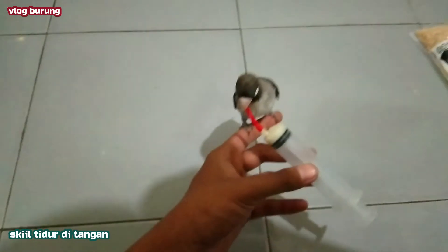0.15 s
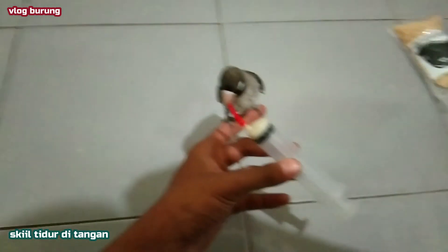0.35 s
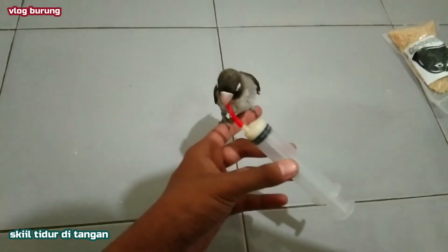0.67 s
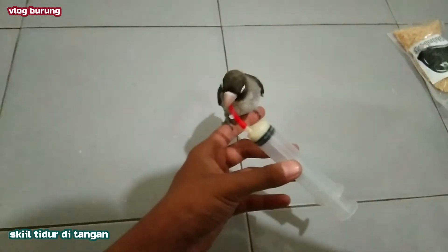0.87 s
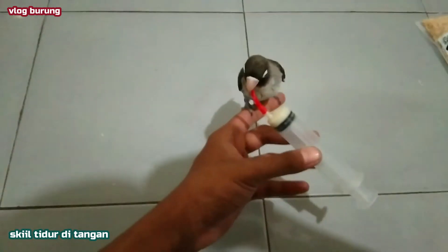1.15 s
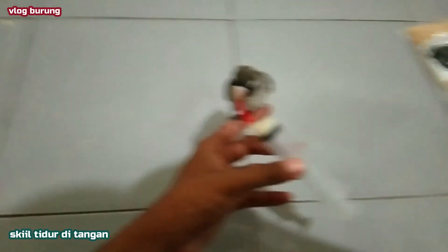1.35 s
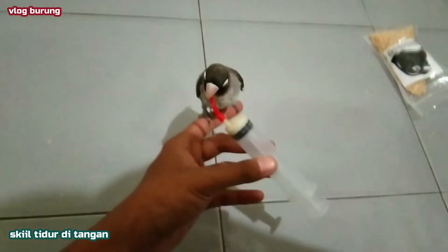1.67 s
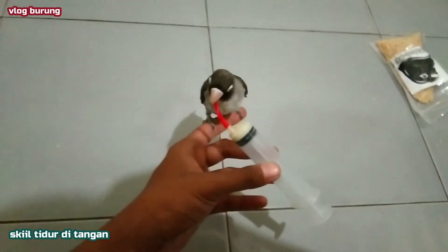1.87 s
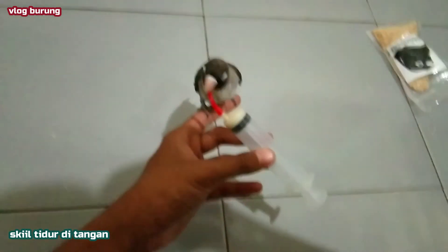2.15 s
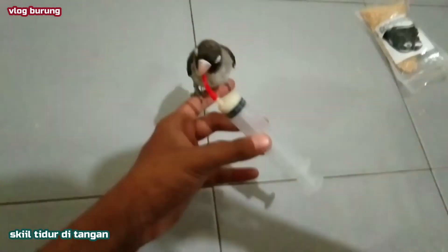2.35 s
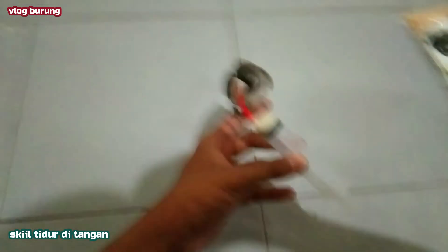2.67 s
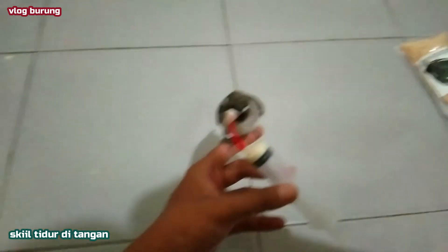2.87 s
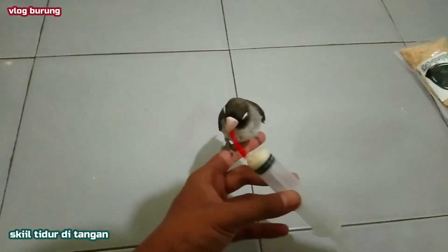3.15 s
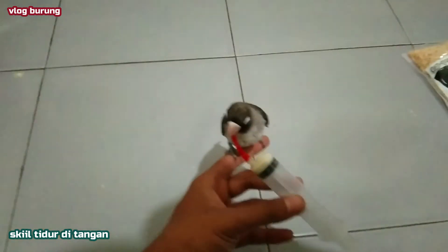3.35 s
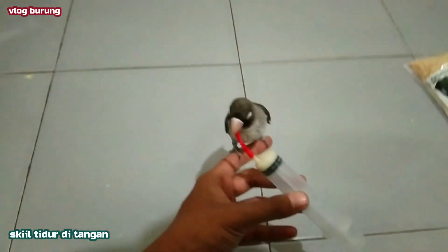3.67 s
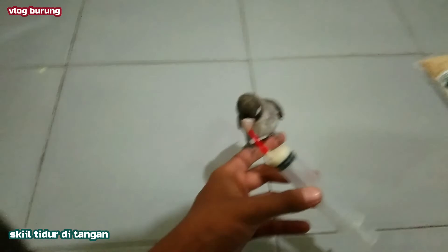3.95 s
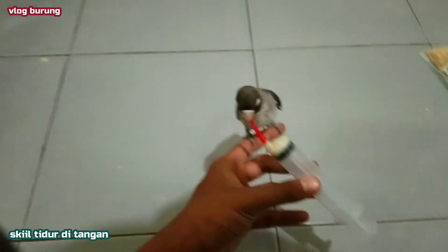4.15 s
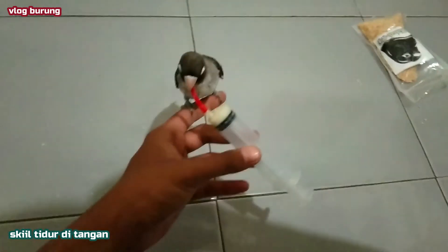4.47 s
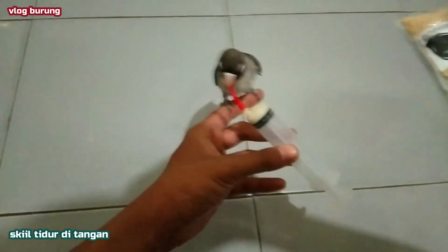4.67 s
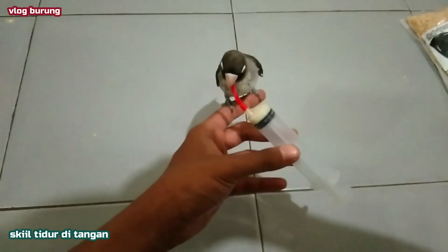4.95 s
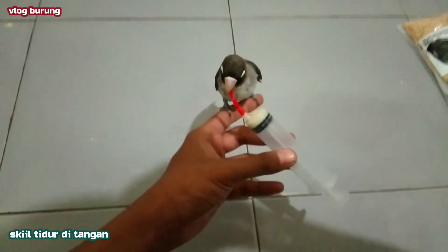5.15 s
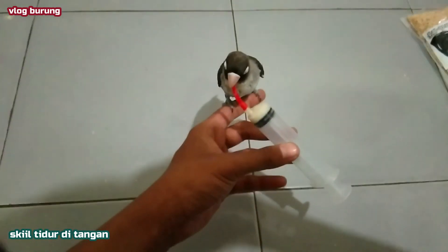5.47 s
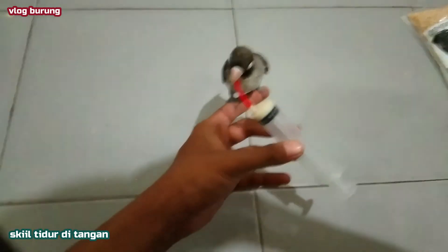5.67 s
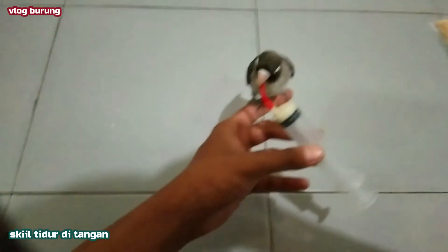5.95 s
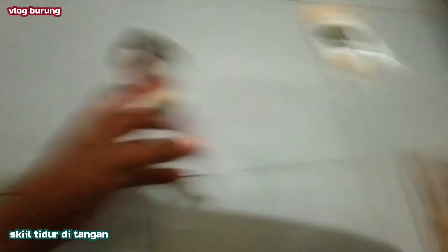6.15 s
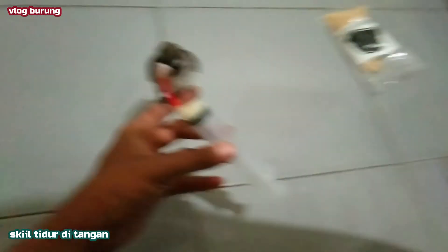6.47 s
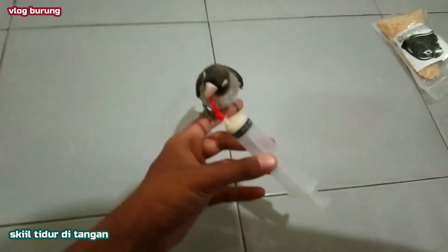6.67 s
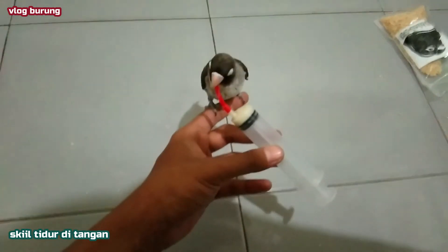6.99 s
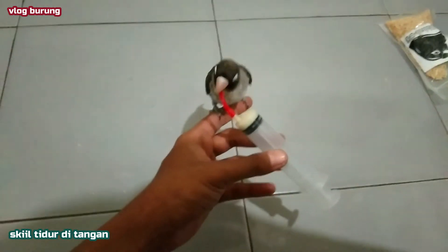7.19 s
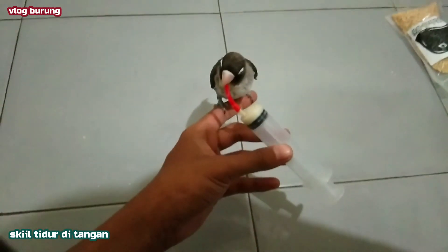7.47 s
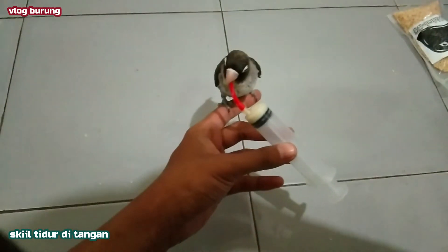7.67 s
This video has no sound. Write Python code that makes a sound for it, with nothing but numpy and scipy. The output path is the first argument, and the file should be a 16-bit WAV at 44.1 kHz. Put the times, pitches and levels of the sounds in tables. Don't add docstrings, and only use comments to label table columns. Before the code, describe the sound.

A handheld phone picks up its own handling, extremely close and dry. From the start, fingers make short hisses and scrapes on plastic, with low grip rumble and irregular ticks. A hard knock hits at 0.64 s, then a loud, rough rasp at 1.0-1.15 s ending in a clack; another sharp clack comes at 1.7. Smaller knocks thin out around 2.7-3.8. Faint, fast falling bird whistles, far away and echoing off hard walls, come at 0.5-0.7, 2.8-3.2, 3.8-4.0, 5.3-5.6 and 7.3-7.7. A barely audible hollow tap from another room falls at 3.6. Strong cracking knocks strike at 4.03 and 4.9, a second loud rasp at 5.7-5.85, and heavy rumbles at 6.2. A cluster of clacks and rumble at 7.05 leads to deep bass swells from 7.3, fading amid small ticks. Quiet room tone persists; loud peaks clip slightly.

```python
import sys
import numpy as np
from scipy import signal
from scipy.fft import rfft, irfft
from scipy.io import wavfile
from scipy.ndimage import uniform_filter1d, minimum_filter1d

SR = 44100
rng = np.random.default_rng(int(sys.argv[2]) if len(sys.argv) > 2 else 0)


def dump_mix(stems):
    frames = np.atleast_2d(stems).T
    limited = np.clip(frames, -1, 1)
    pcm = np.round(limited * 32767).astype(np.int16)
    wavfile.write(sys.argv[1], SR, pcm)


def undo_db(level):
    steps = np.asarray(level, float) / 20
    return 10 ** steps


N = 344862

# time in seconds, hiss level in dB, scrape level in dB.
FINGER_STROKES = [(0.0, -36.5, -28), (0.035, -56, -47), (0.108, -55.5, -51.5), (0.156, -43, -39),
                  (0.269, -58.5, -53), (0.392, -42.5, -41.5), (0.506, -58.5, -74), (0.583, -52.5, -72),
                  (0.65, -47.5, -25), (0.746, -57, -54), (0.8, -45, -51), (0.897, -50, -49.5),
                  (0.962, -50.5, -48.5), (0.984, -27, -28), (1.04, -13.5, -18.5), (1.118, -18.5, -19.5),
                  (1.143, -53, -62.5), (1.168, -54.5, -29.5), (1.234, -49.5, -47), (1.323, -29.5, -27),
                  (1.381, -39, -51), (1.483, -46.5, -43), (1.584, -60, -65), (1.699, -46, -33),
                  (1.898, -60.5, -61.5), (2.089, -42, -40), (2.15, -56.5, -55.5), (2.277, -32.5, -30.5),
                  (2.325, -51.5, -47.5), (2.365, -33, -36), (2.395, -46, -46), (2.469, -33, -32.5),
                  (2.535, -56.5, -48), (2.668, -38, -43.5), (2.816, -55.5, -60.5), (3.044, -49, -57.5),
                  (3.179, -66, -62), (3.23, -50, -46), (3.35, -55.5, -54), (3.588, -52.5, -53),
                  (3.64, -58.5, -47), (3.74, -57.5, -60), (3.825, -52, -55), (3.848, -40.5, -37.5),
                  (3.882, -53.5, -48), (4.009, -35, -40.5), (4.043, -40, -21.5), (4.073, -48, -30.5),
                  (4.242, -51.5, -61), (4.358, -41.5, -44.5), (4.508, -55.5, -58.5), (4.621, -44.5, -54),
                  (4.723, -50.5, -62), (4.742, -51.5, -48.5), (4.811, -61.5, -58.5), (4.886, -54, -42.5),
                  (4.921, -41, -20), (5.059, -59.5, -57), (5.141, -47.5, -51), (5.28, -57.5, -59.5),
                  (5.425, -51, -57.5), (5.477, -29.5, -27.5), (5.509, -50, -52), (5.651, -47.5, -62),
                  (5.684, -50, -41.5), (5.704, -24, -26.5), (5.763, -11.5, -21.5), (5.822, -17.5, -23.5),
                  (5.868, -51.5, -44), (5.908, -55.5, -42.5), (5.969, -38, -51), (6.013, -27, -26.5),
                  (6.136, -41, -60), (6.194, -39, -36), (6.242, -43, -30.5), (6.348, -62, -52.5),
                  (6.388, -48, -55), (6.449, -49, -56.5), (6.652, -42.5, -38), (6.708, -50.5, -54.5),
                  (6.773, -54, -46), (7.022, -53.5, -55.5), (7.057, -35.5, -27.5), (7.091, -53.5, -34.5),
                  (7.177, -46, -49.5), (7.514, -53, -49.5), (7.564, -56.5, -57.5), (7.598, -62, -30.5),
                  (7.642, -56.5, -61.5), (7.725, -60.5, -62.5), (7.751, -67, -54), (7.819, -60.5, -54)]
# time in seconds, rumble level in dB.
GRIP_SQUEEZE = [(0.0, -37.5), (0.158, -36.5), (0.212, -43), (0.241, -35.0), (0.556, -54.5), (0.644, -23),
                (0.761, -47.5), (1.057, -22), (1.142, -41.5), (1.178, -29), (1.216, -42), (1.291, -28),
                (1.616, -43), (1.7, -22.5), (1.918, -47.5), (2.087, -28.5), (2.142, -50), (2.298, -33),
                (2.383, -40.5), (2.411, -28), (2.536, -38), (2.662, -21.5), (2.833, -53), (3.239, -42.5),
                (3.632, -43.5), (3.683, -48), (3.841, -31.5), (3.979, -33), (4.047, -22.5), (4.109, -41),
                (4.249, -50), (4.273, -35.5), (4.345, -29), (4.473, -50), (4.559, -37.5), (4.725, -45),
                (4.742, -39.5), (4.817, -39.5), (4.921, -17.5), (5.06, -56), (5.21, -31.5), (5.279, -55.5),
                (5.479, -29), (5.598, -63), (5.693, -27), (5.761, -14), (5.845, -23), (5.871, -27),
                (5.938, -43.5), (6.099, -23.5), (6.156, -35), (6.176, -16), (6.218, -12.5), (6.252, -24.5),
                (6.323, -39), (6.396, -41.5), (6.455, -40.5), (6.597, -28.5), (6.912, -44), (7.028, -42.5),
                (7.045, -13), (7.057, -12.5), (7.09, -29.5), (7.207, -36.5), (7.33, -29.5), (7.476, -46),
                (7.609, -31.5), (7.666, -60.5), (7.724, -54), (7.74, -52.5), (7.751, -23.5), (7.819, -56)]
# start in seconds, then thud, clack and crack levels in dB.
GRIP_SLIPS = [(0.0555, -31, -30.5, -32.5), (0.0749, -30.5, -35, -33), (0.1019, -31, -40, -48.5),
              (0.142, -29.5, -31.5, -41), (0.2281, -14.5, -17, -33.0), (0.2459, -48, -40.5, -45.0),
              (0.5438, -65.5, -54.5, -40), (0.5946, -41.5, -43.5, -47.5), (0.6131, -27, -25.5, -50),
              (0.6382, -4, -1.5, -6.5), (0.7805, -32, -44.5, -42.0), (0.87, -42.5, -41.5, -46.5),
              (0.9269, -48.5, -38, -30.5), (0.947, -42.5, -45.5, -41), (0.9674, -47, -43, -31.5),
              (0.9768, -22, -23, -22.5), (1.163, -16, -6, -6.5), (1.2767, -17, -14.5, -25),
              (1.309, -40.5, -39.5, -22), (1.3432, -38.5, -22, -23), (1.397, -33, -38.5, -41),
              (1.4788, -32.5, -31, -31), (1.5529, -29, -30.5, -33.5), (1.6267, -46.5, -35.5, -41.5),
              (1.6391, -47, -32.5, -50.0), (1.669, -46, -37.5, -44.5), (1.693, -11.5, -6, -5.5),
              (1.7331, -25, -34, -43), (1.752, -18.5, -15.0, -28), (1.76, -24.5, -38.5, -46),
              (1.8664, -44.5, -56, -52), (1.895, -40, -33.5, -40.5), (2.0237, -29, -28.5, -50),
              (2.0836, -10.5, -25, -30), (2.1621, -28, -38.5, -51), (2.1736, -31.5, -36.5, -40),
              (2.208, -48.5, -36.5, -31), (2.2379, -45, -27, -27.5), (2.2627, -35.5, -58, -35.5),
              (2.2824, -30, -20, -29.5), (2.3082, -14.5, -13.5, -22), (2.4011, -25.5, -35, -32.0),
              (2.4638, -26.5, -56.5, -26.5), (2.4765, -29.5, -18.0, -36), (2.592, -32.5, -31.5, -46.5),
              (2.6065, -47.5, -24, -32.0), (2.62, -50, -31, -32.5), (2.632, -41.5, -42, -30.5),
              (2.6498, -20.5, -25.5, -46.5), (2.6669, -65, -22, -23.5), (2.7264, -31, -38, -30),
              (2.9702, -32.5, -38, -55), (3.0457, -30.5, -30.5, -35.0), (3.1932, -36.5, -32, -37.0),
              (3.2253, -30, -30.5, -33.5), (3.2881, -33, -41, -52), (3.3254, -38, -34.5, -44.5),
              (3.4182, -30.5, -29.5, -34.5), (3.4563, -34.5, -36, -51.0), (3.515, -29, -36.5, -40.5),
              (3.7021, -35.5, -50.5, -31), (3.776, -31.5, -43.5, -44.5), (3.8399, -23.5, -32, -35.5),
              (3.899, -35.5, -34, -31), (3.943, -23.5, -35.5, -28), (3.975, -26.5, -25.0, -30),
              (4.0172, -16.5, -19, -33.5), (4.0337, -10.5, -3, -4.5), (4.0457, -22.5, -6.5, -22),
              (4.195, -31.5, -34.5, -49), (4.2688, -24, -28, -42.5), (4.4067, -36.5, -34.5, -35.5),
              (4.5021, -34.5, -36.0, -54), (4.5109, -33, -52.5, -62.0), (4.5571, -21.5, -26.5, -34),
              (4.7375, -18, -23.5, -34), (4.8884, -34.5, -46.5, -44), (4.9057, -22, -5.5, 0),
              (4.9187, -32.5, -24.0, -19), (4.9309, -18.0, -14, -17.0), (4.9454, -19, -21.5, -31),
              (5.0858, -34, -41.5, -55), (5.2314, -33.5, -39.5, -57), (5.296, -36, -41.5, -55),
              (5.3614, -28.5, -29.5, -42.5), (5.4389, -29, -35, -26.5), (5.4631, -18.5, -23, -38),
              (5.6928, -13.0, -16, -21), (5.8525, -19.5, -17.5, -37), (5.8732, -8, -10, -27),
              (5.957, -65, -65, -44), (6.061, -43, -25.0, -28.5), (6.0951, -16.5, -29, -46.5),
              (6.1666, -30.5, -31, -37.5), (6.1846, -22, -33.5, -25), (6.1973, -19, -12.5, -19.5),
              (6.2265, -27, -20.5, -25.5), (6.237, -33.5, -17, -21.5), (6.248, -13, -31, -25.5),
              (6.283, -34, -41.5, -35), (6.3768, -37, -26.5, -29.5), (6.3871, -23.5, -40, -41.5),
              (6.4672, -31.5, -38.5, -55.5), (6.5266, -22, -26.5, -25.5), (6.583, -21.5, -34, -46),
              (6.6389, -27, -34, -31.5), (6.7623, -32.0, -25.5, -37.5), (6.8196, -35.5, -34, -51),
              (6.8606, -51, -34.5, -58.5), (6.9233, -34.5, -36.5, -39.5), (6.991, -29.5, -36.5, -57.5),
              (7.042, -15, -9, -23.0), (7.056, -18, -6.5, -8.5), (7.0649, -10.5, -8, -7.5),
              (7.1163, -14.5, -24.0, -25.5), (7.1239, -22.5, -29, -31), (7.1993, -27, -39.5, -46.5),
              (7.2363, -30, -20.5, -28), (7.2674, -41, -34.5, -35), (7.2857, -21.5, -42.5, -40.5),
              (7.3288, -10, -15.5, -25.0), (7.3595, -41.5, -35.5, -47), (7.3995, -25.5, -36, -36.0),
              (7.4202, -73.5, -48.5, -40), (7.4417, -22, -31, -39), (7.479, -55.5, -52.5, -35.5),
              (7.5088, -24.5, -28.5, -44), (7.5489, -53, -52.5, -42.5), (7.5912, -19, -23.0, -31.5),
              (7.6003, -42.5, -39, -37), (7.6788, -39, -43.0, -45), (7.7375, -18.5, -33.5, -54),
              (7.7731, -58.5, -61.5, -41)]
# frequency in Hz, level in dB, time to fade by 60 dB in seconds.
THUD_MODES = [(130, -38, 0.066), (227.8, -15, 0.02), (289.6, -7, 0.111), (328.8, 11, 0.0455),
              (411.2, 9.5, 0.0333), (539.4, 2.5, 0.0433)]
CLACK_MODES = [(933.1, -2, 0.0482), (1050.4, 9.5, 0.02), (1376.6, 2.5, 0.0286), (1832, -4, 0.0254),
               (2122, -5, 0.0106), (724, -9.5, 0.0206), (1581, -1, 0.0127)]
CRACK_MODES = [(3132, 3.5, 0.00737), (3700, 11.5, 0.00423), (4593, 7.5, 0.00234), (5530, 12.5, 0.002266),
               (6780, 14, 0.00153), (9260, -8.5, 0.0023)]
# frequency in Hz, level in dB per Hz.
HISS_COLOUR = [(1200, -9), (2300, -4.5), (3500, 0.5), (7000, 3), (16000, -3)]
SCRAPE_COLOUR = [(400, -19.5), (700, 1), (1050, 1.5), (1400, 0.5), (2000, -7), (3400, -26.5)]
RASP_COLOUR = [(1300, -15), (2100, 3.5), (3800, -3.5), (6000, -37)]
RUMBLE_COLOUR = [(40, -20), (100, -10.5), (220, -6.5), (320, 3.5), (450, -5), (650, -11), (1200, -43.5)]
# time in seconds, bass level in dB above the grip rumble.
ARM_SWING = [
    (7.25, -28),
    (7.38, 2),
    (7.8, -5),
]
# start in seconds, length in seconds, start pitch in Hz,
# end pitch in Hz, level in dB, rest on the middle note in seconds.
WHISTLES = [(0.518, 0.058, 4500, 2278, -33.5, .012), (0.725, 0.0564, 4550, 2330, -41, 0.0147),
            (2.775, 0.082, 4274, 2172, -38, 0.0019), (2.866, 0.101, 4183, 2042, -36, 0.017),
            (2.982, 0.095, 4420, 2300, -39, 0.0272), (3.1, 0.086, 4206, 2668, -42, 0.0323),
            (3.834, 0.0856, 4090, 2152, -34, 0.00205), (3.947, 0.087, 4113, 2400, -37.5, .025),
            (5.302, 0.0824, 4240, 2282, -37.5, 0.0041), (5.409, 0.11, 3990, 2390, -39, 0.02786),
            (5.511, .11, 4077, 2329, -35, 0.0188), (7.33, 0.0825, 4133, 2358, -37.5, 0.0105),
            (7.424, 0.0914, 4308, 2307, -37, 0.0297), (7.545, 0.097, 3860, 2374, -40, 0.0363),
            (7.666, 0.037, 4153, 3183, -39, .001)]
# frequency in Hz, level in dB per Hz.
HOUSE_COLOUR = [(40, -7.5), (320, 5.5), (500, -9.5), (1200, -4.5), (3000, -50), (7000, -17.5), (16000, -12)]
# frequency in Hz, gain in dB.
MICROPHONE_RESPONSE = [(6800, 0), (7600, -4.5), (8800, -14), (11400, -24), (15400, -28), (16000, -54.5)]


def colour(x, points, band=(0, SR)):
    hz = np.fft.rfftfreq(len(x), 1 / SR)
    at, db = np.transpose(points)
    spectrum = rfft(x) * undo_db(np.interp(np.log(hz + 1), np.log(at), db))
    in_band = (hz > band[0]) & (hz < band[1])
    power = np.sum(np.abs(spectrum[in_band]) ** 2) * 2 / len(x) ** 2
    return irfft(spectrum, len(x)) / np.sqrt(power)


def curve(table):
    seconds, *columns = np.transpose(table)
    return [np.interp(np.arange(N) / SR, seconds, column) for column in columns]


def walk(rate):
    hold = int(SR / rate)
    levels = np.repeat(rng.standard_normal(N // hold + 1), hold)
    return uniform_filter1d(levels, hold)[:N]


def grains(scatter_db):
    sizes = undo_db(scatter_db * rng.exponential(size=N))
    return rng.standard_normal(N) * sizes


def ring(pushes, modes, place_db):
    out = 0
    for hz, db, t60 in modes:
        pole = np.exp(2j * np.pi * hz / SR - np.log(1000) / (t60 * SR))
        weight = undo_db(db + place_db * rng.standard_normal((len(pushes), 1)))
        out = out + weight * signal.lfilter([1], [1, -pole], pushes).imag
    return out


def fingers():
    hiss_db, scrape_db = curve(FINGER_STROKES)
    grip_db = curve(GRIP_SQUEEZE)[0]
    ridges = grains(2.0) * undo_db(1.5 * walk(160) + 1.2 * walk(40))
    hiss = colour(ridges, HISS_COLOUR, band=(4500, 8000))
    scrape = colour(ridges * undo_db(4.17 * walk(60)), SCRAPE_COLOUR, band=(800, 2200))
    tremble_db = np.minimum(6 * walk(70) + 4 * walk(23), 6)
    grip = colour(grains(2.7) * undo_db(tremble_db), RUMBLE_COLOUR, band=(150, 600))
    rasp_db = 1.4536 * np.minimum(hiss_db, scrape_db - 1.0) + 6.5
    rasp = colour(ridges, RASP_COLOUR, band=(2200, 4000)) * undo_db(rasp_db)
    hiss = hiss * undo_db(hiss_db - 0.1145)
    scrape = scrape * undo_db(scrape_db - 1.38)
    return rasp + hiss + scrape + grip * undo_db(grip_db - 2.5)


def slips():
    start, thud_db, clack_db, crack_db = np.array(GRIP_SLIPS).T[:, :, None]
    size = 3072
    t = np.arange(size) / SR
    place = ((start * SR).astype(int) + np.arange(size)).ravel()
    # modes, peak level in dB, contact time in seconds
    parts = [(THUD_MODES, thud_db + 4.5, 0.004),
             (CLACK_MODES, clack_db + 6.5, 0.0022),
             (CRACK_MODES, crack_db + 13.0, 0.0012)]
    out = 0
    for modes, db, contact in parts:
        shape = np.exp(-t / contact) + 0.36 * np.exp(-t / 0.00467)
        push = rng.standard_normal((len(start), size)) * shape
        push[:, 0] += 4.81 * np.sqrt(contact * 1000)
        knock = ring(push, modes, place_db=3.5)
        peak = np.max(np.abs(knock), axis=1, keepdims=True)
        knock = knock / peak * undo_db(db)
        out = out + np.bincount(place, knock.ravel(), N + size)[:N]
    return out


def sway():
    db = curve(ARM_SWING)[0] + curve(GRIP_SQUEEZE)[0]
    bass = colour(rng.standard_normal(N), [(30, -12), (110, 5.5), (300, -34)], band=(50, 150))
    return bass * undo_db(db)


def far_bird():
    song = np.zeros(N)
    rest_hz = 3165
    for start, length, start_hz, end_hz, db, rest in WHISTLES:
        t = np.arange(int(length * SR)) / SR
        step_hz = max(rest_hz, end_hz)
        reach = (length - rest) * 0.76 * (start_hz - step_hz) / (start_hz - end_hz)
        hz = np.interp(t, [0, reach, reach + rest, length], [start_hz, step_hz, step_hz, end_hz])
        hz = uniform_filter1d(hz, size=200)
        fullness = np.interp(hz, [2200, 2600, 2900, rest_hz, 3550, 4000], [0.8, 1.1, 0.7, 1.9, 0.3, 0.55])
        swell = fullness * np.sqrt(np.sin(np.pi * t / length))
        at = int(start * SR)
        song[at:at + len(t)] += undo_db(db) * swell * np.sin(2 * np.pi * np.cumsum(hz) / SR)
    return song


def far_knock():
    t = np.clip(np.arange(N) / SR - 3.62, 0, None)
    push = rng.standard_normal(N) * np.exp(-t / 0.0094) * (t > 0)
    modes = [(1450, -47, 0.012), (1720, -45, 0.012), (2350, -56, 0.01)]  # Hz, dB, fade in s
    return ring(push[None], modes, place_db=0)[0]


def walls(x):
    t = np.arange(SR // 2) / SR
    echoes = rng.standard_normal(len(t)) * np.exp(-np.log(1000) * t / 0.248)
    echoes = echoes / np.sqrt(np.sum(echoes ** 2))
    return 0.22 * x + signal.fftconvolve(x, echoes)[:N]


def house():
    return colour(rng.standard_normal(N), HOUSE_COLOUR) * undo_db(-60.5 + 2.4 * walk(2.414))


def scene():
    near = fingers() + slips() + sway()
    far = walls(far_bird() + far_knock())
    return (near + far + house())[None]


def microphone(x):
    x = signal.sosfilt(signal.butter(3, 85, "high", fs=SR, output="sos"), x)
    size = 512
    at, db = np.transpose(MICROPHONE_RESPONSE)
    gain = undo_db(np.interp(np.fft.rfftfreq(size, 1 / SR), at, db))
    cepstrum = irfft(np.log(gain))
    cepstrum[1:size // 2] *= 2
    cepstrum[size // 2 + 1:] = 0
    return signal.lfilter(irfft(np.exp(rfft(cepstrum))), [1], x)


def limiter(x):
    gain = minimum_filter1d(1 / np.maximum(np.abs(x) / 1.08, 1), size=257)
    return np.clip(x * uniform_filter1d(gain, size=257), -1, 1)


def top_cut(x):
    return signal.sosfilt(signal.butter(12, 16410, fs=SR, output="sos"), x)


def record(dry):
    mix = limiter(microphone(dry))
    return top_cut(mix)


dry = scene()
out = record(dry)
dump_mix(out)
```